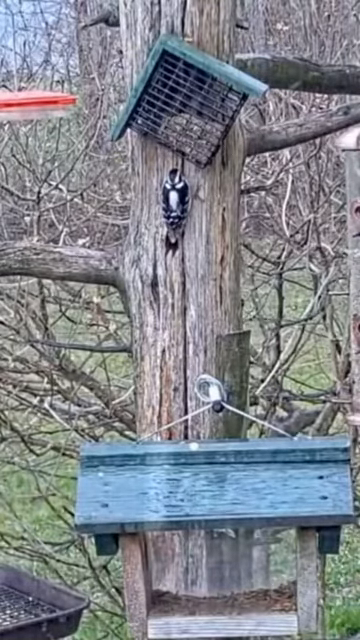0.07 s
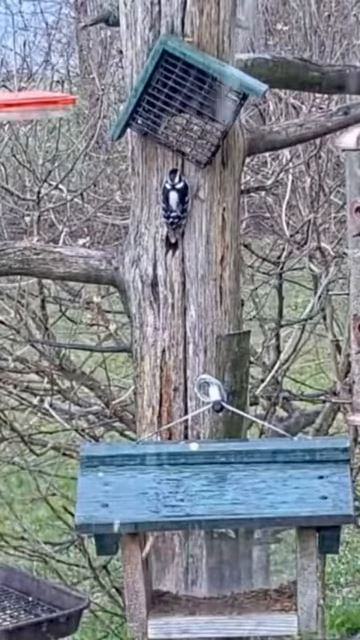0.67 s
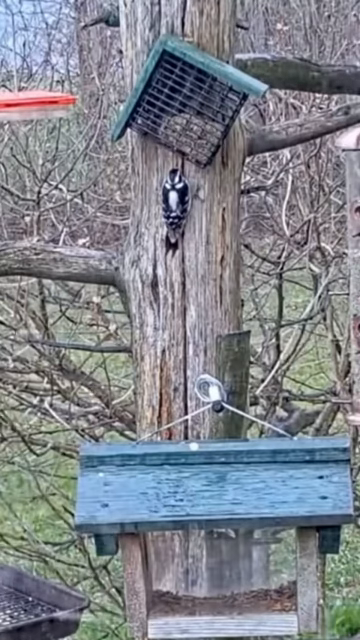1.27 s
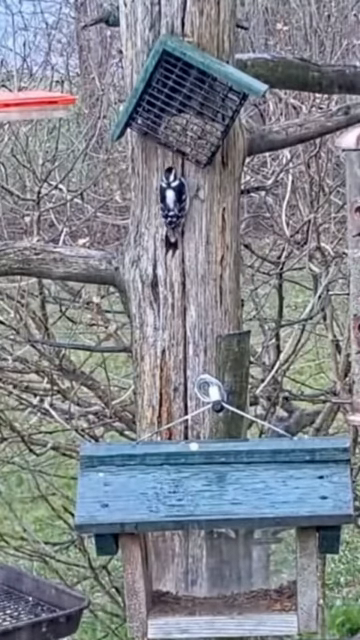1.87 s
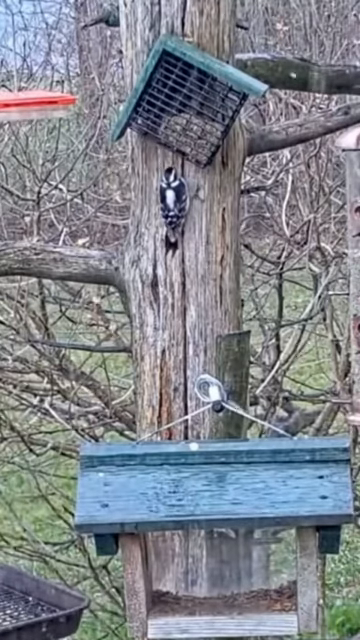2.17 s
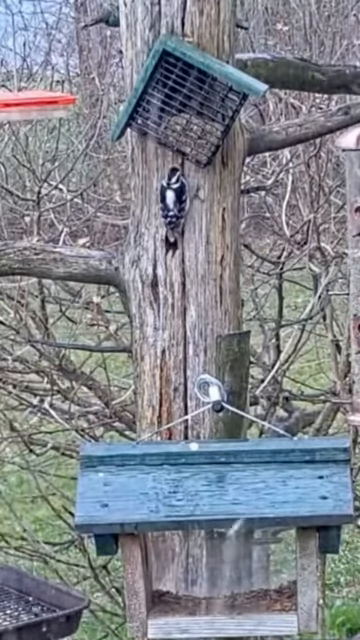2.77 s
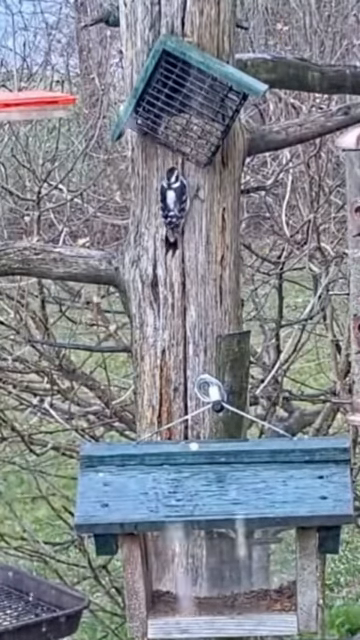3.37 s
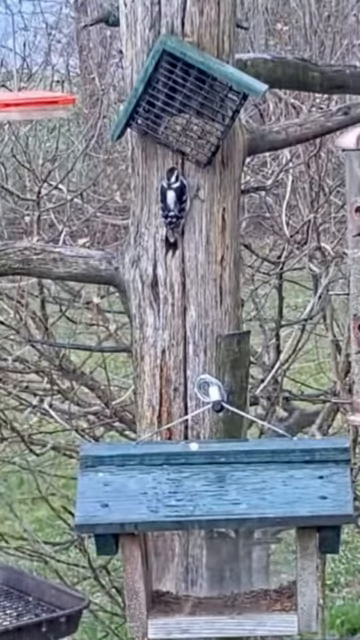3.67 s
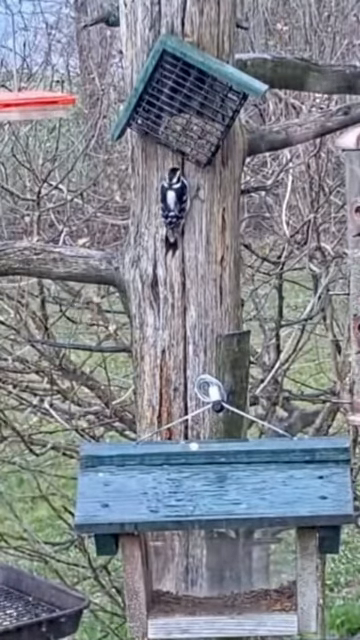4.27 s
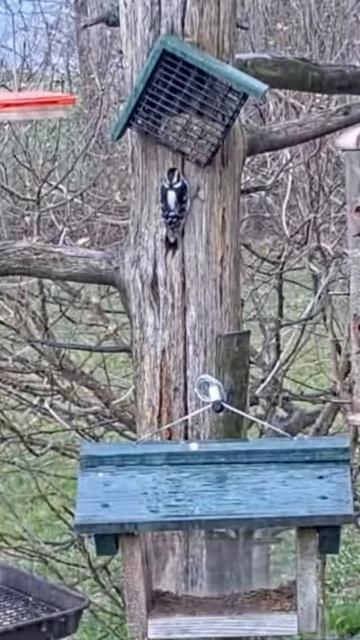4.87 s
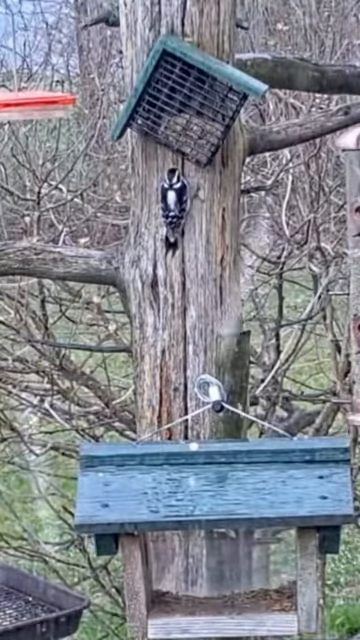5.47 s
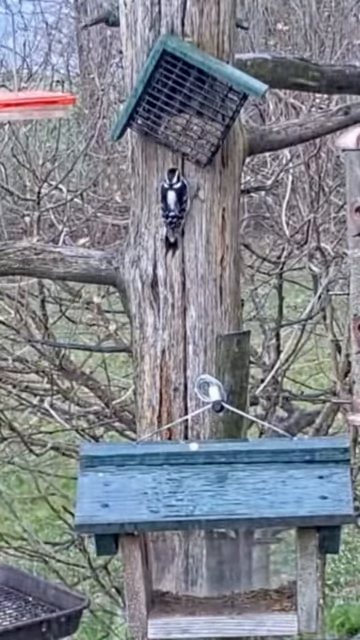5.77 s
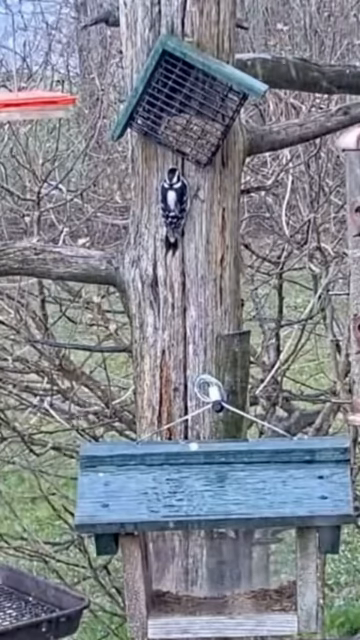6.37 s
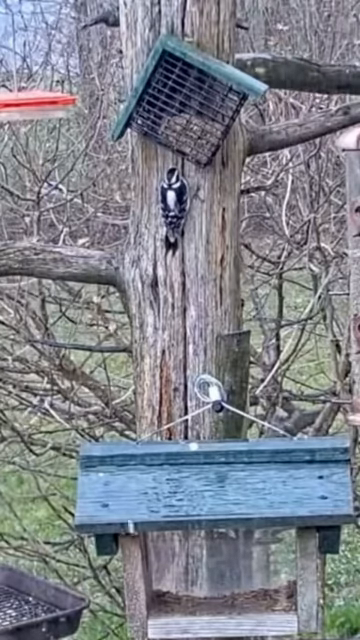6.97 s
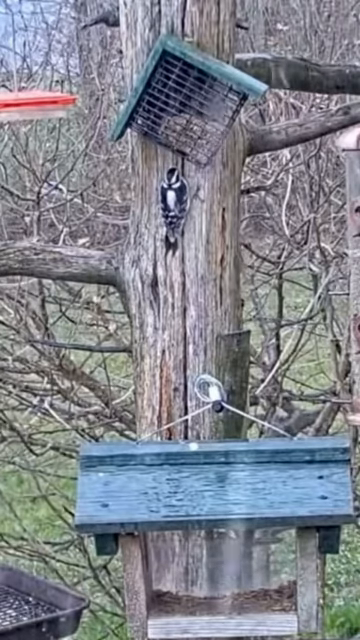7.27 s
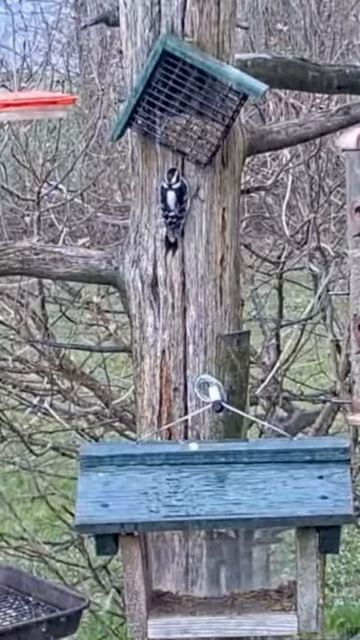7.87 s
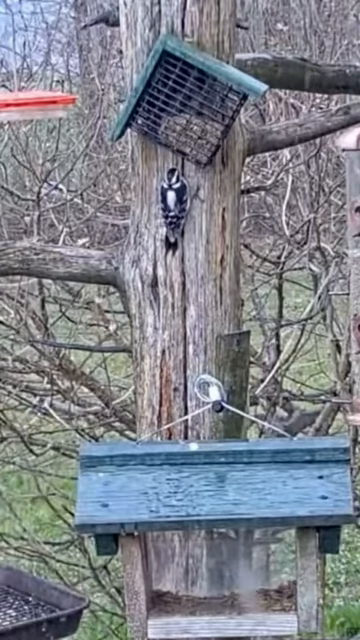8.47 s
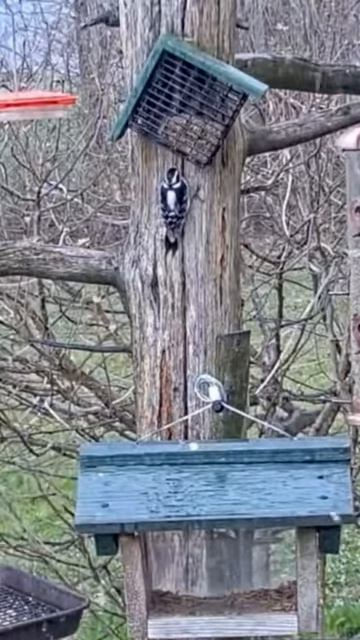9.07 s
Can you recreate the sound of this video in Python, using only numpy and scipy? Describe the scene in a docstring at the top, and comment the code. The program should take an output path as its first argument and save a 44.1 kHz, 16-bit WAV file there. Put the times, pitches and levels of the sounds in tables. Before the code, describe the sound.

Rain mixed with small hail falls in a backyard for about nine seconds, heard in mono close to wooden and plastic bird feeders. A steady, flickering hiss of far drops runs throughout, with nearer wet splashes and irregular pellet ticks. A few drops ping briefly on a hollow vessel or cage wires. A distant engine drones faintly, low and wavering, until about 2.4 seconds. Harder hailstones crack on the feeders at about 0.4, 2, 3.8 and 4.3 seconds, in a quick cluster just after 5, and with a bright snap at 6.4. A low gust builds from around 3 seconds, peaks near 4.6 and eases off, with dull bass thumps mostly between 4.4 and 6 seconds. Splashes and clicks stay busy through 7 and 8 seconds over a weaker rumble. The engine hum returns from about 8 seconds to the end.

```python
"""Rain and small hail in a backyard, on a mono microphone near wooden and plastic bird feeders.
At first a distant engine drones low under the hiss of countless far drops. All along, nearer drops
splash, single pellets crack on the feeders and a few drops ring a hollow vessel or the cage wires.
Midway a gust rumbles past, with dull low thumps. The engine returns at the end."""
import sys
import numpy as np
from scipy import signal
from scipy.fft import rfft, irfft
from scipy.io import wavfile

SR = 44100
rng = np.random.default_rng(int(sys.argv[2]) if len(sys.argv) > 2 else 0)


def log_audio(samples):
    """Write samples as a 16-bit WAV file to the path given in sys.argv[1]."""
    # one column per channel
    frames = np.atleast_2d(samples).T
    # limit to full scale, then quantise
    limited = np.clip(frames, -1, 1)
    pcm = np.round(limited * 32767).astype(np.int16)
    wavfile.write(sys.argv[1], SR, pcm)


N = 406161
TIME = np.arange(N) / SR
SPLASH_HZ, SPLASH_SPREAD_OCTAVES = 4270, 0.14   # pitch range of random splashes and pellet snaps
# modes of the feeders' wooden roof: pitch_hz, q, gain_db
ROOF_MODES = [(1150, 37, 1), (1780, 9.6, -6), (2540, 23, 2), (2720, 43, -20), (4300, 2.4, 3.5)]


def from_db(db):
    """Decibels as an amplitude ratio."""
    return 10 ** (np.asarray(db) / 20)


def rms_one(x):
    """Scales x to rms 1."""
    return x / np.sqrt(np.mean(x ** 2) + 1e-20)


def at_hz(spectrum, hz):
    """A spectrum's level in dB, read on a log-frequency axis."""
    points_hz, levels_db = np.transpose(spectrum)
    return np.interp(np.log(hz), np.log(points_hz), levels_db)


def drift(rate_hz):
    """A slow random wander with spread 1."""
    step, settle = 40, 2000
    pole = np.exp(-2 * np.pi * rate_hz * step / SR)
    white = rng.standard_normal(N // step + settle + 2)
    slow = signal.lfilter([1], [1, -2 * pole, pole * pole], white)[settle:]
    return np.interp(np.arange(N) / step, np.arange(len(slow)), rms_one(slow))


def noise(spectrum):
    """Noise of the given colour, rms 1."""
    hz = np.maximum(np.arange(N // 2 + 1) * SR / N, 1)
    return rms_one(irfft(rfft(rng.standard_normal(N)) * from_db(at_hz(spectrum, hz)), N))


def resonate(x, hz, q, order=1):
    """A band around hz, about hz / q wide."""
    spread = np.exp(.5 / q)
    edges_hz = [hz / spread, min(hz * spread, SR / 2 - 1)]
    return signal.sosfilt(signal.butter(order, edges_hz, "band", fs=SR, output="sos"), x + 1e-18)


def damped(hz, t60_s):
    """A struck mode: a sine of height 1 dying away."""
    t = TIME[:SR // 2]
    return np.sin(2 * np.pi * hz * t) * from_db(-60 * t / t60_s)


def burst(x, db):
    """Scales a short sound to the energy of 10 ms at this level."""
    return x * from_db(db) / np.sqrt(np.sum(x ** 2) / (SR / 100))


def add(out, start_s, x):
    """Mixes x in from start_s on."""
    i = max(round(start_s * SR), 0)
    out[i:i + len(x)] += x[:max(N - i, 0)]


def arrivals(per_s, spread_db, cap):
    """Random impacts: mostly small or far, a few big and near, up to cap spreads louder."""
    sizes = from_db(spread_db * np.minimum(rng.exponential(1, N), cap))
    return sizes * (rng.random(N) < per_s / SR)


def chance_events(per_s, count):
    """Events at random times: rows of start_s, then count normal deviates held within +-2."""
    times = np.cumsum(rng.exponential(1, size=200)) / per_s
    deviations = np.clip(rng.standard_normal((len(times), count)), -2, 2)
    return np.column_stack([times, deviations])[times < N / SR]


def spray(rise_s, fall_s):
    """A 50 ms envelope that swells and dies, like the droplets thrown up by a bursting drop."""
    t = TIME[:SR // 20]
    return (1 - np.exp(-t / rise_s)) * np.exp(-t / fall_s)


def engine():
    """A distant engine: only its firing note carries, wavering; it sags and fades through each pull."""
    # the engine's pulls: start_s, length_s, pitch_hz, sag_hz_per_s, level_db
    pulls = [(0.0, 0.96, 88.8, 4.1, -44.5), (0.602, 0.99, 84, 12, -32.5), (1.61, 0.75, 80, 3, -37.5),
             (8.062, 0.14, 86, 1.5, -32.5), (8.297, 0.75, 88, 2.9, -30)]
    attack_s, release_s, fade_db_per_s = 0.051, 0.057, 5.5
    out = np.zeros(N)
    waver, swell = 1 + 0.011 * drift(5.5), from_db(0.91 * drift(3.6))
    for start_s, length_s, hz, sag, db in pulls:
        t = np.clip(TIME - start_s, 0, length_s + release_s)
        envelope = np.clip(np.minimum(t / attack_s, 1 + (length_s - t) / release_s), 0, 1)
        phase = 2 * np.pi * np.cumsum((hz - sag * t) * waver) / SR
        out += envelope * from_db(db - fade_db_per_s * t) * np.sin(phase)
    return np.sqrt(2) * swell * out


def wind():
    """Deep buffeting under a rush; gusts lift both above the breeze and eddies shake them together."""
    # gusts that swell and die away: peak_s, rise_s, peak_db
    gusts = [(2.8, 0.56, -37), (3.68, 0.36, -33), (4.58, 0.43, -28), (4.8, 0.2, -34), (6.7, 0.63, -38),
             (7.55, 0.14, -40.5), (8.6, 0.64, -36)]
    # spectrum of the buffeting: frequency_hz, level_db
    buffet_colour = [(15, -17), (30, 7), (45, 8.5), (85, 0), (130, -9), (220, -38.5)]
    # spectrum of the rush: frequency_hz, level_db
    rush_colour = [(50, -10), (90, 4), (150, 1), (250, -7), (500, -16), (800, -26.5), (1600, -39.5)]
    breeze_db, fall_over_rise, buffet_db_per_wind_db = -41.5, 2.8, 1.1
    power = from_db(breeze_db) ** 2
    for peak_s, rise_s, db in gusts:
        past_peak = (TIME - peak_s) / rise_s
        envelope = np.exp(np.minimum(past_peak, -past_peak / fall_over_rise))
        power = power + (from_db(db) * envelope) ** 2
    wind_db = 10 * np.log10(power)
    buffet_db = wind_db.mean() + buffet_db_per_wind_db * (wind_db - wind_db.mean())
    eddies = from_db(2.0 * drift(12.0))
    buffet = from_db(buffet_db) * noise(buffet_colour)
    rush = from_db(wind_db + 2.5) * noise(rush_colour)
    return eddies * (buffet + rush)


def thumps():
    """Dull thumps, each a few dying cycles of bass."""
    # low thumps: start_s, pitch_hz, level_db, t60_s
    hits = [(3.6, 302, -18, .05), (4.383, 120, -11.5, .1), (4.524, 90, -8.5, .12),
            (4.660, 65.4, -2.5, 0.047), (4.712, 79.4, -4, .05), (4.747, 62, -6, .09), (4.843, 52, -3, 0.12),
            (4.864, 61.5, 1, 0.068), (5.231, 91.4, -7.5, 0.14), (5.885, 141, -1, 0.079),
            (5.935, 95, -12.5, 0.11), (6.757, 85, -18.5, .25), (7.520, 74.5, -16, 0.25),
            (7.74, 328, -14.5, 0.019), (8.828, 290, -16, .025)]
    out = np.zeros(N)
    for start_s, hz, db, t60_s in hits:
        add(out, start_s, from_db(db) * damped(hz, t60_s))
    return signal.sosfilt(signal.butter(2, 350, fs=SR, output="sos"), out)


def far_hiss():
    """Countless far drops merge into a hiss whose level flickers."""
    # spectrum of the far rain: frequency_hz, level_db
    hiss_colour = [(200, 1.5), (400, -2), (693, -3.5), (1060, 1), (1500, 0.5), (2100, -2.5), (2620, 0.5),
                   (3190, -1.5), (4170, 0.5), (5500, -3.5), (6900, -5), (7600, -25)]
    return from_db(.9 * drift(22)) * noise(hiss_colour)


def patter():
    """Drops around the yard burst into a few ms of spray, coloured by the surface that each one hits."""
    # loudness of the wet surfaces: pitch_hz, level_db
    surfaces = [(2400, -11), (3000, -3.5), (3600, 5), (4200, 5), (5200, 3.5), (6800, -2)]
    out, envelope = 0, spray(rise_s=0.0011, fall_s=0.0042)
    flurry = from_db(2.3 * drift(6.3))   # drops come in bunches
    for hz in np.geomspace(2500, 6800, num=12):
        drops = arrivals(per_s=17 * flurry, spread_db=4.0, cap=2.4)
        power = np.maximum(signal.oaconvolve(drops ** 2, envelope ** 2)[:N], 0)
        droplets = np.sqrt(power) * rng.standard_normal(N)
        wet = resonate(droplets, hz, q=12.0) + from_db(-14) * resonate(droplets, 3000, q=.9)
        out = out + from_db(at_hz(surfaces, hz)) * wet
    return rms_one(out)


def taps():
    """Small pellets tick on bark, twigs and ground, each ringing for a few cycles."""
    # loudness of the struck surfaces: pitch_hz, level_db
    surfaces = [(650, -17), (850, 7.5), (1100, 9), (1500, 1), (2000, 8), (2700, -7), (3600, -2)]
    out = 0
    for hz in np.geomspace(680, 3500, num=14):
        clicks = arrivals(per_s=22, spread_db=2.5, cap=2.0) * rng.choice([-1, 1], N)
        tick = resonate(clicks, hz, q=7.0) + from_db(-17.0) * resonate(clicks, 2600, q=0.9)
        out = out + from_db(at_hz(surfaces, hz)) * rms_one(tick)
    return rms_one(out)


def yard_echo(x):
    """Trunks and walls scatter a short, thin tail."""
    envelope = spray(rise_s=0.014, fall_s=0.019)
    tail = envelope * rng.standard_normal(len(envelope))
    return signal.oaconvolve(x, tail / np.sqrt(np.sum(tail ** 2)))[:N]


def splashes():
    """Big drops near the microphone: a swell of spray sets one glassy resonance ringing."""
    # the biggest drops on wet wood and leaves: start_s, pitch_hz, level_db
    big_drops = [(0.221, 3530, -29.5), (0.865, 4170, -31.5), (0.897, 4250, -34), (1.063, 3470, -33.5),
                 (1.544, 4030, -35), (1.980, 4160, -31.5), (2.236, 4390, -30.5), (2.493, 3570, -35),
                 (2.921, 4180, -30.5), (2.979, 4400, -29.5), (3.040, 4800, -31), (3.271, 4700, -32),
                 (3.334, 4240, -31.5), (3.351, 3540, -28), (3.394, 4000, -33.5), (3.435, 4960, -28.5),
                 (3.451, 4285, -31.5), (4.045, 4230, -36.5), (4.295, 4170, -34), (4.556, 4060, -33.5),
                 (4.653, 5250, -31), (4.935, 4240, -30), (4.959, 4170, -31), (5.148, 4900, -31.5),
                 (5.295, 4700, -29), (5.515, 4280, -30.5), (5.602, 3620, -31), (5.918, 4180, -31),
                 (6.231, 3320, -30.5), (6.630, 3100, -32), (6.716, 3630, -28.5), (6.823, 3580, -34),
                 (6.893, 3570, -28), (7.045, 3620, -32), (7.164, 3950, -32), (7.244, 4400, -34),
                 (7.257, 4600, -33), (7.389, 3770, -31.5), (7.614, 4160, -25.5), (7.700, 4410, -33),
                 (7.846, 3480, -31.5), (7.868, 4800, -32), (8.082, 3780, -28.5), (8.132, 3920, -31),
                 (8.236, 3930, -30.5), (8.425, 4920, -31.5), (8.745, 4100, -31.5), (8.887, 3500, -36),
                 (8.906, 6360, -28.5), (9.045, 5100, -30)]
    other_drops = [(start_s, SPLASH_HZ * 2 ** (SPLASH_SPREAD_OCTAVES * pitch), -34.5 - 0.4 * softness)
                   for start_s, pitch, softness in chance_events(per_s=0.97, count=2)]
    out, envelope = np.zeros(N), spray(rise_s=.0025, fall_s=.0044)
    for start_s, hz, db in big_drops + other_drops:
        droplets = envelope * rng.standard_normal(len(envelope))
        ring = burst(resonate(droplets, hz, q=30.0), db - 5.0)
        fizz = burst(resonate(droplets, 4400, q=1.4, order=2), db - 4.0)
        add(out, start_s - .001, ring + fizz)
    return out


def vessel_pings():
    """A drop spreads on a hollow vessel and swells into a short round note."""
    # the clearest drops on the vessel: start_s, level_db
    clear_drops = [(0.122, -33.5), (0.682, -34.5), (1.815, -40), (2.323, -28), (5.336, -40), (5.573, -36),
                   (6.017, -37), (7.851, -30.5)]
    # the vessel's modes: pitch_hz, gain_db, t60_s
    modes = [(1070, -1, 0.05), (1760, -11, 0.043), (2460, -12.5, 0.035), (3360, -8, .035),
             (5400, -4, 0.027)]
    faint_drops = [(start_s, -42 + size) for start_s, size in chance_events(per_s=1.0, count=1)]
    out, envelope = np.zeros(N), spray(rise_s=.002, fall_s=.004)
    swell = 1 - np.exp(-TIME[:SR // 2] / .003)   # the drop spreads for about 3 ms
    for start_s, db in clear_drops + faint_drops:
        spot_db = rng.normal(0, 2.0, len(modes))   # each spot favours other modes
        ring = sum(from_db(mode_db + spot) * damped(hz, t60_s)
                   for (hz, mode_db, t60_s), spot in zip(modes, spot_db))
        droplets = envelope * rng.standard_normal(len(envelope))
        add(out, start_s, burst(swell * ring, db))
        add(out, start_s, burst(resonate(droplets, 3800, q=1.2), db - 6.0))
    return out


def cage_tinks():
    """A cage wire answers a drop with one thin note."""
    # drops on the wire cage: start_s, pitch_hz, level_db
    drops = [(1.432, 2486, -30.5), (2.603, 2480, -34), (3.351, 2460, -33), (5.296, 2480, -31),
             (7.866, 2430, -32), (8.007, 2500, -30)]
    out = np.zeros(N)
    for start_s, hz, db in drops:
        add(out, start_s, from_db(db) * damped(hz, t60_s=0.079))
    return out


def soft_pellets():
    """Random softer hits for pellets(): size sets knock, crack and snap together."""
    rows = []
    for start_s, softness, body_pitch, snap_pitch in chance_events(per_s=1.6, count=3):
        body_db, crack_db, snap_db = np.array([-40.5, -42.5, -33.5]) - 2.5 * softness
        body_hz = 1040 * 2 ** (0.54 * body_pitch)
        snap_hz = SPLASH_HZ * 2 ** (SPLASH_SPREAD_OCTAVES * snap_pitch)
        rows.append((start_s, body_hz, body_db, crack_db, snap_hz, snap_db))
    return rows


def pellets():
    """Close by, a slushy pellet knocks, rings a feeder's hollow roof and snaps as it falls apart."""
    # slushy pellets on the feeders: start_s, body_hz, body_db, crack_db, snap_hz, snap_db
    hits = [(1.432, 1530, -50, -39, 4700, -32.5), (1.560, 720, -40, -52, 4000, -40),
            (1.595, 750, -35.5, -45, 4080, -38), (1.741, 1140, -43, -48, 6360, -29),
            (2.043, 755, -37, -52, 4000, -46), (2.213, 1380, -32.5, -47, 4390, -32),
            (2.605, 1110, -38, -38, 4000, -31), (2.7345, 1060, -54, -35, 3500, -30.5),
            (3.513, 1690, -38.5, -53, 4000, -48), (3.841, 700, -37, -46, 4000, -46),
            (4.077, 1190, -36, -36.5, 4080, -41), (4.296, 1400, -37, -45, 5200, -38),
            (4.995, 1020, -39, -39, 4260, -27.5), (5.030, 776, -38, -48, 4000, -38),
            (5.041, 895, -36, -40, 4180, -30.5), (5.055, 1730, -36, -48, 4000, -38),
            (5.2828, 1300, -42, -43, 4540, -29), (5.373, 1130, -38, -50, 4000, -48),
            (5.636, 1000, -35, -44, 4000, -46), (5.675, 1210, -31, -36, 4470, -32),
            (6.222, 990, -35, -44, 4000, -41), (6.345, 1200, -37, -40, 4020, -44),
            (6.796, 684, -33.5, -50, 3400, -53), (7.076, 1000, -37, -49, 4000, -44),
            (7.122, 1310, -37, -45, 4250, -32.5), (7.1355, 1840, -31, -49, 6000, -39),
            (7.187, 820, -34.5, -45, 3460, -33), (7.2203, 1300, -46, -39, 3200, -32),
            (7.2481, 1350, -30, -37, 4560, -30.5), (7.683, 1560, -50, -45, 3840, -30.5),
            (7.74, 1040, -31, -46, 3880, -46), (7.742, 1540, -33.5, -47, 3400, -50),
            (7.9, 1570, -39, -40, 4000, -44), (7.9917, 960, -56, -48, 5200, -29),
            (8.2841, 1140, -37, -56, 3470, -28.5), (8.4148, 1270, -29.5, -62, 4760, -52),
            (8.735, 890, -38, -40, 4000, -36), (8.829, 860, -36.5, -31, 3200, -32)]
    out, envelope = np.zeros(N), spray(rise_s=.0005, fall_s=.0022)
    impact_sample = SR // 2000
    for start_s, body_hz, body_db, crack_db, snap_hz, snap_db in hits + soft_pellets():
        # the weaker the hit, the slushier the pellet: more spatter around its contact
        slush = from_db(-.5 * (max(body_db, crack_db, snap_db) + 21))
        shards = slush * envelope * rng.standard_normal(len(envelope))
        # the pellet breaks and lands again whole cycles later, which gives the knock its pitch
        cycles = max(round(rng.uniform(.0009, .002) * body_hz), 1)
        contact = np.zeros(len(envelope))
        contact[impact_sample] = 1
        contact[impact_sample + round(cycles * SR / body_hz)] = rng.uniform(.35, .65)
        knock = resonate(contact + .2 * shards, body_hz, q=2.5, order=2)
        knock += from_db(-18) * resonate(contact, .7 * body_hz, q=.8, order=2)
        spot_db = rng.normal(0, 3.5, len(ROOF_MODES))   # each spot favours other modes
        roof = sum(from_db(db + spot) * resonate(contact + 0.19 * shards, hz, q)
                   for (hz, q, db), spot in zip(ROOF_MODES, spot_db))
        click = resonate(contact + 0.3 * shards, 2440, q=2.5, order=2)
        crack = burst(click, crack_db - 5.0) + burst(roof, crack_db - 1.0)
        snap = resonate(contact + 0.25 * shards, snap_hz, q=4.8, order=2)
        snap += from_db(-10.5) * resonate(contact + 0.7 * shards, 4700, q=1.9, order=2)
        add(out, start_s - .0008, burst(knock, body_db) - crack + burst(snap, snap_db))
    return out


def hailstones():
    """Close by, a hard stone knocks, cracks and snaps; its rebound hollows the sound, ice chips fly."""
    # hard stones bouncing off the feeders:
    # start_s, body_hz, body_db, crack_hz, crack_db, snap_hz, snap_db, rebound_ms, rebound_share
    stones = [(0.4303, 1030, -22.5, 2310, -23, 3940, -23.5, 0.71, .33),
              (1.9517, 1280, -21.5, 2320, -30, 3700, -29, 0.65, 0.37),
              (3.764, 1190, -23, 2800, -37, 4700, -29.5, 0.85, 0.88),
              (4.343, 1590, -23.5, 2430, -24, 4050, -25, 1.25, 0.65),
              (5.0712, 1370, -20.5, 2370, -22, 4280, -23, 1.76, 0.44),
              (5.099, 1440, -28.5, 2650, -27.5, 4440, -33, 1.66, 0.45),
              (5.2090, 1300, -18.5, 2670, -26, 3380, -30, 0.83, 0.31),
              (6.4100, 1050, -32, 1900, -38, 4430, -14.5, 1.12, 0.54)]
    out, envelope = np.zeros(N), spray(rise_s=.0006, fall_s=0.0033)
    small_body = signal.butter(2, 850, "high", fs=SR, output="sos")   # small feeders hardly ring lower
    for start_s, body_hz, body_db, crack_hz, crack_db, snap_hz, snap_db, rebound_ms, share in stones:
        contact = np.zeros(len(envelope))
        contact[0] = 1
        contact[round(rebound_ms * SR / 1000)] += share
        knock = burst(signal.sosfilt(small_body, resonate(contact, body_hz, q=2.1, order=2)), body_db)
        thud = burst(resonate(contact, 830, q=0.76), max(body_db, snap_db) - 14.5)
        crack = burst(resonate(contact, crack_hz, q=2.56, order=2), crack_db)
        snap = burst(resonate(contact, snap_hz, q=3.0, order=2), snap_db)
        shards = envelope * rng.standard_normal(len(envelope))
        roof = burst(sum(from_db(db) * resonate(shards, hz, q) for hz, q, db in ROOF_MODES), body_db - 13)
        chips = burst(resonate(shards, 5600, q=1.7), crack_db - 5.5)
        add(out, start_s, thud + knock - crack + snap + roof + chips)
    return out


def scene():
    """The shower's strength drives hiss, patter and taps together; near hits echo off the yard."""
    # strength of the shower: time_s, level_db
    shower = [(0.0, -32.5), (0.33, -34.5), (3.0, -33.5), (5.59, -33.5), (7.95, -33.5), (9.21, -35)]
    shower_db = np.interp(TIME, *np.transpose(shower))
    rain = from_db(-1.02) * far_hiss() + from_db(-4.0) * patter() + from_db(-10.0) * taps()
    rain *= from_db(shower_db + 0.48)
    near = from_db(2.5) * splashes() + from_db(1.87) * hailstones() + from_db(3.5) * pellets()
    near += from_db(4.0) * (vessel_pings() + cage_tinks())
    echo = from_db(-20) * yard_echo(near)
    mono = rain + near + echo + wind() + from_db(-3.5) * thumps() + engine()
    return np.array([mono, mono])


def record(dry):
    """A narrow-band mono microphone: no deepest bass, rounded peaks, no top."""
    low_cut_hz, high_cut_hz, ceiling = 18, 7260, .78
    sound = signal.sosfilt(signal.butter(2, low_cut_hz, "high", fs=SR, output="sos"), dry)
    sound = ceiling * np.tanh(sound / ceiling)
    high_cut = signal.firwin(121, high_cut_hz, window=("kaiser", 7), fs=SR)
    return signal.oaconvolve(sound, high_cut[None], "same", axes=1)


dry = scene()
out = record(dry)
log_audio(out)
```